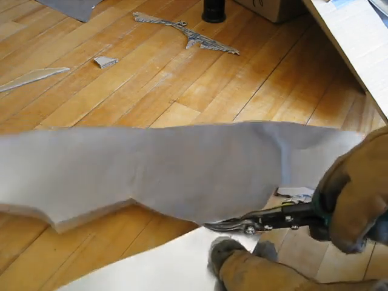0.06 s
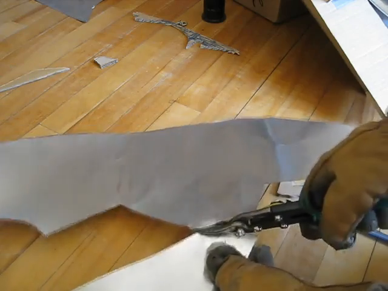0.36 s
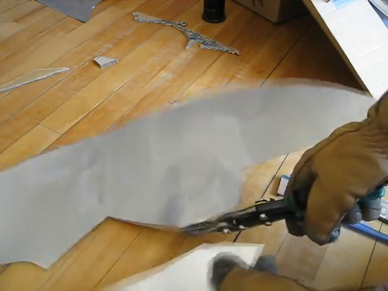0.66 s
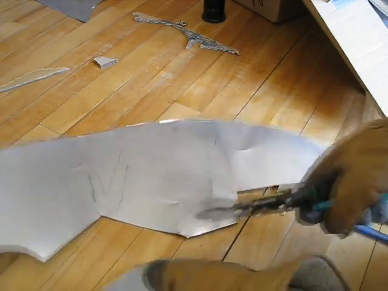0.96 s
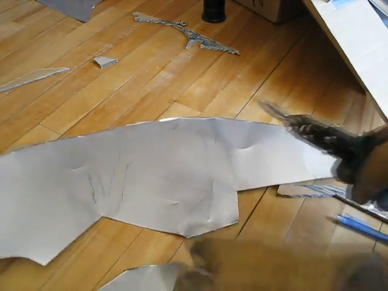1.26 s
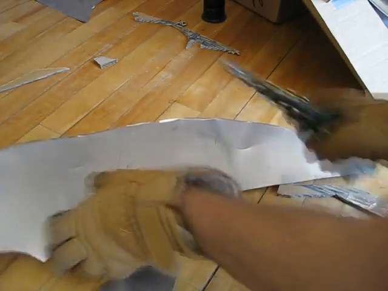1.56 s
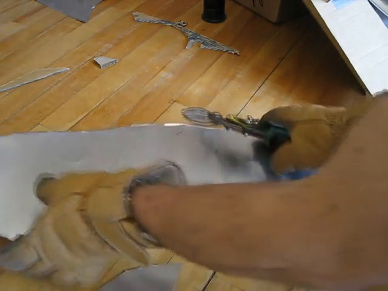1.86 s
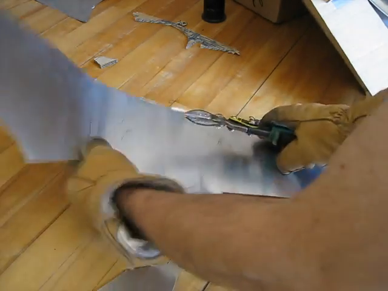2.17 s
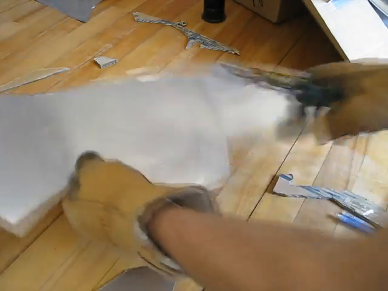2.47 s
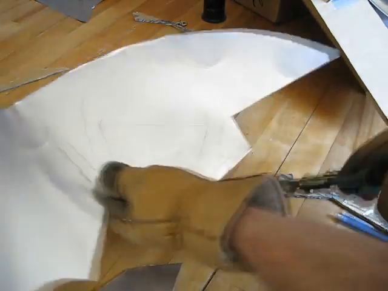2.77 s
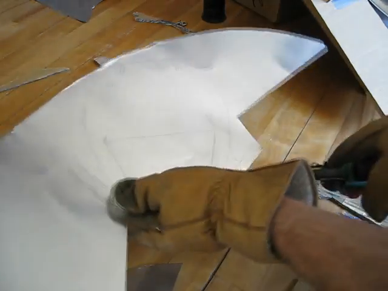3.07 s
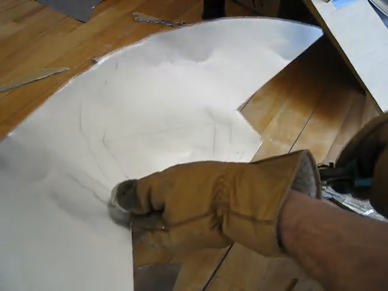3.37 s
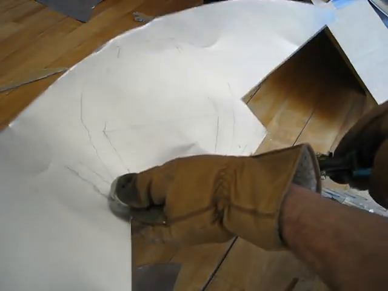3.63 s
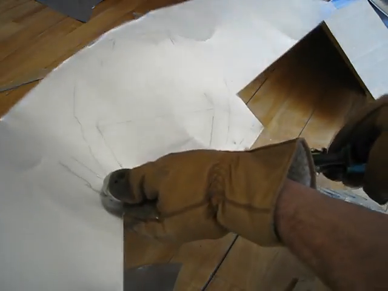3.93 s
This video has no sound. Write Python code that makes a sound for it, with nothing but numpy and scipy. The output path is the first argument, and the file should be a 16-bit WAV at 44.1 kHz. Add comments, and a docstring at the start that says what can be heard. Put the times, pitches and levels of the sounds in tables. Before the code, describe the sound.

Thin sheet metal is cut with snips close by, crunching until the blades close with sharp clicks. A ringing, hissing scrape follows, then metallic knocks and pops as the sheet is moved over wooden boards.

```python
"""Snips cutting thin aluminium

Snips finish a cut through a sheet on a wooden floor: the metal crunches and the blades snap shut.
The offcut is drawn along the edge with a ringing scrape; the sheet is shifted, buckles, flops down
and is tapped. A small camera close by turns down and distorts the loudest sounds."""
import sys
import numpy as np
from scipy import signal
from scipy.fft import rfft, irfft, next_fast_len
from scipy.io import wavfile
from scipy.ndimage import uniform_filter1d, map_coordinates

SR = 44100
rng = np.random.default_rng(int(sys.argv[2]) if len(sys.argv) > 2 else 0)


def pcm_store(signal):
    """Save signal as 16-bit PCM."""
    levels = np.round(np.clip(np.atleast_2d(signal), -1, 1) * 32767)
    wavfile.write(sys.argv[1], SR, levels.astype(np.int16).T)


N = 176400

# Levels are relative. A mode is a natural tone of the metal; t60 is the time to fade by 60 dB.
# the sheet's modes (f/Hz, level/dB)
SHEET_MODES = [(485, -1.5), (540, -5), (643, -2), (764, 0), (1070, -10.5), (1160, -0.5), (1270, -5.5),
               (1598, 2.5), (2124, 0), (2370, 0), (2572, 0), (2920, -6), (3216, 1.5)]
# its crowded overtones (f/Hz, level/dB)
OVERTONES = [(40, -48), (150, -15.5), (220, -12), (330, -2.5), (520, 6), (1000, 4), (2200, 3.5), (3100, 1),
             (4300, 1.5), (6200, -5), (9000, -13), (15500, -20.5)]
# how long it rings (f/Hz, t60/s)
RING_TIMES = [(100, 0.56), (520, 0.49), (1400, 0.36), (3700, 0.24), (10000, 0.15)]
# strokes of cutting and rubbing, one list each (t/s, level/dB)
RUB_STROKES = [
    [(0, -9.5), (.08, -15.5), (.14, -9.5), (.19, -16), (.25, -23), (.34, -27), (.39, -18.5), (.457, -8),
     (.468, -17), (.55, -27), (.576, -5.5), (.6, -14), (.72, -15.5), (.8, -11.5), (.85, -12), (.95, -16.5),
     (1.02, -32), (1.35, -56)],
    [(1.88, -53), (1.93, -24), (2.1, -26.5), (2.15, -11), (2.2, -19.5), (2.37, -32.5)],
    [(2.93, -53), (3.04, -27), (3.14, -60)],
]
# their tone colour (f/Hz, level/dB)
RUB_COLOUR = [(60, -32), (200, -24.5), (380, -9.5), (650, 3.5), (1300, 7), (2400, 6), (3500, -3.5),
              (6000, -26.5), (15000, -34)]
# the lifted sheet bends and its modes glide (t/s, pitch factor)
FLEX_GLIDE = [(0.599, .97), (.76, .82), (1, 1.15), (1.3, 1.7)]
# edge sliding on edge (t/s, ring level/dB, hiss level/dB)
SCRAPE_STROKES = [
    [(0, -18, -42), (.135, -16, -31), (.19, -17.5, -47), (.27, -27.5, -67), (.36, -29.5, -43),
     (.48, -18, -37), (.55, -20.5, -39), (.6, -6.5, -21), (.7, -16, -31), (.81, -23.5, -36.5),
     (.92, -40, -37.5), (.935, -22, -25), (.99, -17, -18.5), (1.055, -17.5, -26.5), (1.08, -11.5, -19.5),
     (1.115, -20.5, -38), (1.155, -10.5, -23), (1.2, -16.5, -25.5), (1.28, -17, -25.5), (1.37, -20, -42),
     (1.48, -33, -47.5), (1.63, -34, -42), (1.67, -25, -29.5), (1.76, -39, -34), (1.88, -25.5, -39),
     (1.95, -16.5, -32), (2.13, -27, -36.5), (2.27, -30, -46), (2.36, -28.5, -40)],
]
# tone colour of the scrape's ring (f/Hz, level/dB)
SCRAPE_COLOUR = [(300, -54), (1000, -19.5), (1600, -1), (2800, 3.5), (4200, 7.5), (5000, 1.5), (6400, -5.5),
                 (8000, -14), (12000, -20)]
# tone colour of its hiss (f/Hz, level/dB)
HISS_COLOUR = [(3000, -28.5), (6500, 5), (8500, 1), (10500, 2), (12500, 1), (15500, -8)]
# tone colour of the background (f/Hz, level/dB)
BACKGROUND_COLOUR = [(18, -42), (30, -18), (144, -13), (300, -11.5), (673, -10.5), (996, -3.5), (1770, -13),
                     (2830, -19.5), (5890, -25), (8060, -31), (15500, -34)]
# background level, sinking while the camera turns itself down, then coming back (t/s, level/dB)
BACKGROUND_LEVEL = [(0, -28.5), (.9, -44.5), (1.05, -51), (1.25, -50.5), (1.45, -33), (1.9, -33.5),
                    (2.88, -31.5), (3.18, -27.5), (3.68, -30), (4, -31.5)]
# knocks on the sheet (t/s, level/dB, bass/dB, middle/dB, treble/dB, ring time factor)
KNOCKS = [(.051, -10, -7, -3, -3.5, 0.27), (0.121, -14, -5, -9, 1.5, 0.76),
          (0.255, -10.5, -12, 2, -6, 0.12), (.286, -14.5, -8, 0, -7.5, 0.81),
          (.348, -9, -2.5, -1, -5, 1.03), (.509, -27.5, 6, 17, -6, 0.38), (0.751, -14, -2, -5, -2.5, 0.47),
          (1.575, -20, -19, -7, -6.5, 1.3), (1.649, -16.5, -24, -7, -4.5, 2.8),
          (1.776, -6.5, -17, -6.5, 3, 1.06), (2.009, -9, -9, -2, -16.5, 1.21),
          (2.118, -18, 6.5, 1.5, 4.5, 0.7), (2.413, -19.5, 7, 11.5, -24, 1.67),
          (2.547, -17.5, 11, -7, -2.5, 0.55), (2.745, -31.5, -5, -14, -3.5, 0.92),
          (3.346, -24, 9.5, 11.5, -3, 0.6), (3.372, -25, -0.5, 4.5, -9, 0.99),
          (3.63, -34, -2.5, 8, 2, 3.05)]
# blades snap through or an edge catches (t/s, level/dB, thump/dB, crack t60/s, ping/dB)
SNAPS = [(0.257, -20, -44, 0.006, -1), (0.4605, 2.5, -19.5, 0.015, 0.5), (.509, -3.5, -46, 0.012, -7),
         (.577, 6.5, -7, 0.035, -25), (0.846, -19.5, -35, 0.076, -32), (0.925, -15.5, -34, 0.02, -30),
         (0.976, -9, -34, 0.018, -25), (1.149, -8.5, -24, 0.026, -24), (1.777, -8.5, -37, 0.055, -29)]
# tone colour of the crack (f/Hz, level/dB)
CRACK_COLOUR = [(100, -37), (600, -17.5), (2300, -3.5), (3600, 6), (5000, 4), (7000, -3), (11000, -7),
                (16000, -12.5)]
# the offcut's modes (f/Hz, level/dB)
OFFCUT_MODES = [(1475, 0), (1911, -4), (2363, -13), (3750, 2), (4059, 1.5), (4414, -5.5), (4570, 0),
                (4797, 6), (4957, 0.5), (5663, 0.5)]
# how loudly it sings (t/s, level/dB)
OFFCUT_LEVEL = [(.9, -45), (.95, -25), (1.16, -22.5), (1.28, -21.5), (1.38, -27.5), (1.55, -54)]
# bulges pop, each with a pair of tones
# (t/s, level/dB, bass/dB, middle/dB, treble/dB, ring time factor, lower tone f/Hz, pair level/dB)
BUCKLES = [(2.158, -4, -17, -16, -11.5, 0.65, 2110, -5), (2.366, -12.5, 8, 11, -19, 0.81, 642, 9.5),
           (2.468, -24.5, 17.5, 14.5, -22, 1.06, 495, 16.5), (3.220, -0.5, -11, -14, -8, 0.76, 2135, -2),
           (3.484, -14, -5.5, -3.5, -3.5, 0.8, 1933, -2.5)]
# low modes of the whole sheet (f/Hz, level/dB)
HUM_MODES = [(253, -25.5), (361, -23.5)]


def amp(db):
    """Turn decibels into a gain."""
    return 10 ** (np.asarray(db) / 20)


def unit(x):
    """Scale to an average (rms) strength of 1."""
    return x / np.sqrt(np.mean(x ** 2) + 1e-20)


def along(points, hz):
    """Read between (f/Hz, value) points on a log frequency axis."""
    f, values = np.transpose(points)
    return np.interp(np.log(hz + 1), np.log(f + 1), values)


def loudness(strokes, column=1):
    """A smooth gain over time from one dB column; silent between strokes."""
    t = np.arange(N) / SR
    gain = 0
    for rows in map(np.array, strokes):
        gain += amp(np.interp(t, rows[:, 0], rows[:, column], left=-120, right=-120))
    return uniform_filter1d(gain, size=200)


def rise(t, seconds):
    """A soft start, from 0 towards 1."""
    return 1 - np.exp(-t / seconds)


def fade(t, t60):
    """A fall of 60 dB every t60 seconds."""
    return amp(-60 * t / t60)


def wobble(rate):
    """A smooth curve through `rate` random values a second."""
    values = rng.standard_normal(int(N * rate / SR) + 4)
    return map_coordinates(values, [np.arange(N) * rate / SR])


def filtered(x, response):
    """Scale each frequency of x by response(hz)."""
    size = next_fast_len(len(x) + 8192)
    return irfft(rfft(x, size) * response(np.fft.rfftfreq(size, 1 / SR)), size)[:len(x)]


def tinted(x, colour):
    """Give x a tone colour, at strength 1."""
    return unit(filtered(x, lambda hz: amp(along(colour, hz))))


def add(track, start_s, sound):
    """Mix a sound into the track."""
    i = max(0, round(start_s * SR))
    track[i:i + len(sound)] += sound[:max(0, N - i)]


def ring_down(x, ring_factor):
    """Fade x as the sheet does: high tones die first."""
    hz, t, spectrum = signal.stft(x, SR, nperseg=256)
    t60 = ring_factor * along(RING_TIMES, hz)[:, None]
    return signal.istft(spectrum * fade(t, t60), SR, nperseg=256)[1][:len(x)]


def resonant(modes, width_hz):
    """Noise ringing in narrow modes, at strength 1."""
    def response(f):
        damping = 1j * f * width_hz
        return sum(amp(db) * damping / (hz * hz - f * f + damping) for hz, db in modes)
    return unit(filtered(rng.standard_normal(N), response))


def friction(slips_per_s, spread_db, colour, ring_db, patchy_db):
    """Tiny random slips, heard directly and through metal whose ringing shifts as it bends."""
    slips = (rng.random(N) < slips_per_s / SR) * amp(spread_db * np.clip(rng.standard_normal(N), -2, 2))
    slips *= rng.choice([-1, 1], N)
    slips *= amp(3 * wobble(rate=70))  # fast flutter
    bends = np.array([wobble(rate=6.07) for _ in range(4)])
    ringing = 0
    for share in bends / np.linalg.norm(bends, axis=0):  # drift between four different rings
        ring = ring_down(rng.standard_normal(SR // 3), 1)
        ringing += signal.fftconvolve(slips * share, ring / np.linalg.norm(ring))[:N]
    spectrum = signal.stft(slips + amp(ring_db) * ringing, nperseg=512)[2]
    # louder and softer patches across pitch and time
    patches = uniform_filter1d(rng.standard_normal(spectrum.shape), size=3, axis=0)
    patches = unit(uniform_filter1d(patches, size=10, axis=1))
    uneven = signal.istft(spectrum * amp(patchy_db * patches), nperseg=512)[1][:N]
    return tinted(uneven, colour)


def rubbing():
    """The sheet crunches between the blades and drags over the boards; its modes glide as it bends."""
    crunch = friction(slips_per_s=1000, spread_db=6, colour=RUB_COLOUR, ring_db=7, patchy_db=1.5)
    pitch = np.interp(np.arange(N) / SR, *np.transpose(FLEX_GLIDE))
    gliding = map_coordinates(resonant(SHEET_MODES, width_hz=29), [np.cumsum(pitch)], mode="mirror")
    return amp(-1.5) * loudness(RUB_STROKES) * unit(crunch + amp(-9) * tinted(gliding, RUB_COLOUR))


def scraping():
    """Cut edges catch on each other in fine, bright slips."""
    ring = friction(slips_per_s=2200, spread_db=5, colour=SCRAPE_COLOUR, ring_db=5, patchy_db=2)
    hiss = friction(slips_per_s=2200, spread_db=5, colour=HISS_COLOUR, ring_db=3, patchy_db=2)
    return (amp(-2.5) * loudness(SCRAPE_STROKES) * ring
            + amp(2.5) * loudness(SCRAPE_STROKES, column=2) * hiss)


def background():
    """A soft rush, strongest near 1 kHz, that sinks and comes back along a set curve."""
    rush = tinted(rng.standard_normal(N), BACKGROUND_COLOUR)
    return loudness([BACKGROUND_LEVEL]) * rush * amp(0.28 * wobble(rate=15))


def blow(t, bass_db, middle_db, treble_db):
    """One blow wakes the sheet's modes and overtones; a soft, broad touch favours the bass."""
    touch = [(550, bass_db), (850, middle_db), (1400, middle_db), (2050, 0), (2900, 0), (4200, treble_db)]
    overtones = tinted(rng.standard_normal(len(t)), OVERTONES)
    overtones = filtered(overtones, lambda hz: amp(along(touch, hz)))
    modes = 0
    for hz, db in SHEET_MODES:  # level and pitch vary a little from blow to blow
        gain = amp(db + along(touch, hz) + rng.normal(0, 0.67))
        modes += gain * np.sin(2 * np.pi * (hz * rng.normal(1, 0.00616) * t + rng.random()))
    return amp(4.5) * overtones + amp(-10) * modes


def knocks():
    """Every knock sets the sheet ringing again."""
    out, t = np.zeros(N), np.arange(SR) / SR
    for start_s, db, bass_db, middle_db, treble_db, ring_factor in KNOCKS:
        ring = ring_down(blow(t, bass_db, middle_db, treble_db), ring_factor)
        add(out, start_s, amp(db) * ring * rise(t, 0.001))
    return out


def snaps(ping_hz=3350, thump_hz=230):
    """The blades snap or an edge catches: a hard crack and a ping, with a thump under them."""
    out, t = np.zeros(N), np.arange(SR // 8) / SR
    for start_s, db, thump_db, t60, ping_db in SNAPS:
        crack = tinted(rng.standard_normal(len(t)), CRACK_COLOUR) * fade(t, t60)
        rumble = filtered(rng.standard_normal(len(t)), lambda hz: 1 / np.hypot(1, hz / thump_hz))
        thump = amp(thump_db) * unit(rumble) * fade(t, t60=0.023)
        ping = amp(ping_db) * np.sin(2 * np.pi * ping_hz * t) * fade(t, t60=0.025)
        add(out, start_s, 2 * amp(db) * (crack + thump + ping) * rise(t, 0.00069))
    return out


def offcut():
    """The freed strip sings in narrow modes as it slides off the edge."""
    return loudness([OFFCUT_LEVEL]) * resonant(OFFCUT_MODES, width_hz=12)


def buckles():
    """A bulge pops through: a blow with a pair of clear tones, then the whole sheet hums on."""
    out, t = np.zeros(N), np.arange(SR) / SR
    tone = lambda hz: np.sin(2 * np.pi * (hz * t + rng.random())) * rise(t, 0.0028)
    for start_s, db, bass_db, middle_db, treble_db, ring_factor, lower_hz, pair_db in BUCKLES:
        pair = amp(pair_db) * (tone(lower_hz) + amp(-3.5) * tone(lower_hz * 1.12))
        pop = ring_down(blow(t, bass_db, middle_db, treble_db) + pair, ring_factor)
        hum = sum(amp(level + bass_db) * tone(hz) for hz, level in HUM_MODES) * fade(t, t60=1.47)
        add(out, start_s, amp(db) * (pop + hum) * rise(t, 0.001))
    return out


def scene():
    """All the sounds meet at one microphone."""
    return (knocks() + buckles() + snaps() + rubbing() + scraping() + offcut() + background())[None]


def record(dry):
    """The camera turns itself down on loud treble, flattens peaks and trims the highest tones."""
    limit_db, recover_db_per_s, ceiling = -12.5, 95, 1.3
    notch_hz, notch_width_hz, top_hz = 7830, 600, 15850
    x, t = dry[0], np.arange(N) / SR
    smooth = np.exp(-1 / (0.0062 * SR))  # averages over about 6 ms
    treble_power = signal.lfilter([1 - smooth], [1, -smooth], np.diff(x, prepend=0) ** 2)
    cut_db = 0.74 * np.maximum(10 * np.log10(treble_power + 1e-12) - limit_db, 0)
    recovery_db = recover_db_per_s * t
    x = x * amp(recovery_db - np.maximum.accumulate(cut_db + recovery_db))  # drop at once, climb back
    x = x / (1 + np.abs(x / ceiling) ** 12) ** (1 / 12)  # flatten the peaks
    x = x * ((t < 3.943) | (t > 3.96))  # the sound cuts out briefly
    notch = lambda hz: 1 - 0.84 / (1 + ((hz - notch_hz) / notch_width_hz) ** 2)  # a narrow treble dip
    return filtered(x, lambda hz: notch(hz) * (hz < top_hz))[None]


dry = scene()
out = record(dry)
pcm_store(out)
```